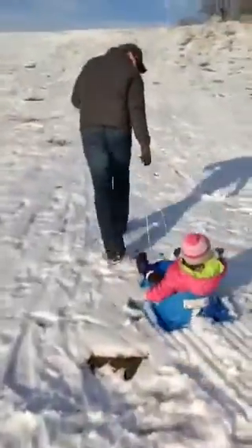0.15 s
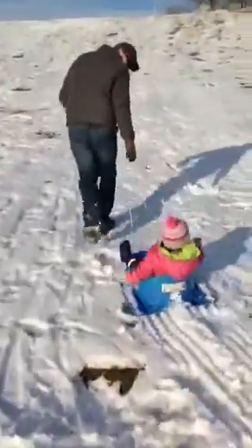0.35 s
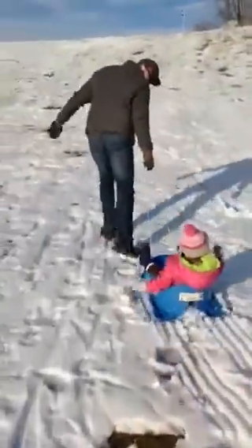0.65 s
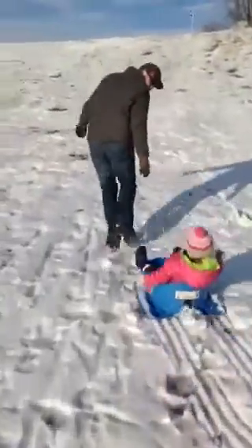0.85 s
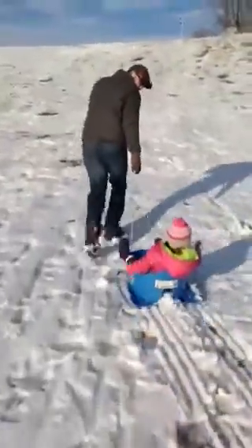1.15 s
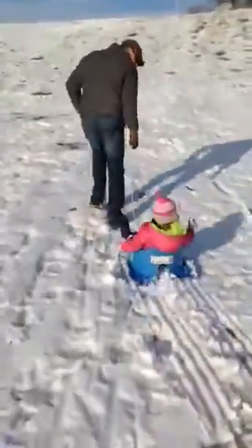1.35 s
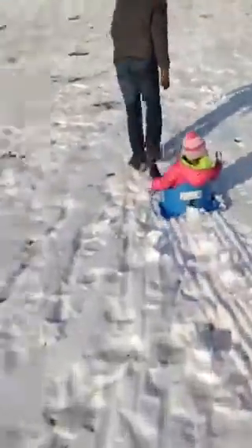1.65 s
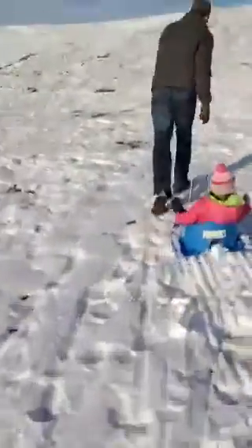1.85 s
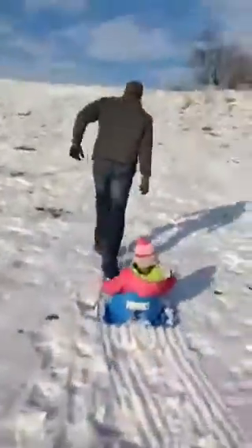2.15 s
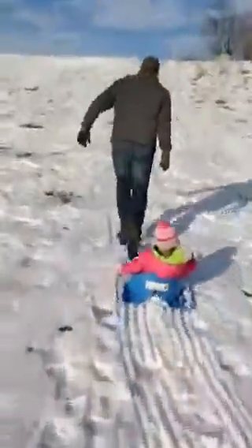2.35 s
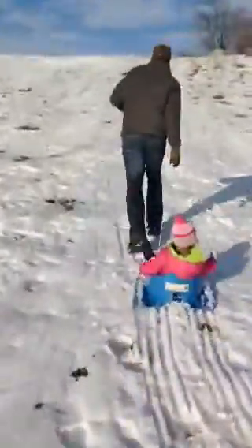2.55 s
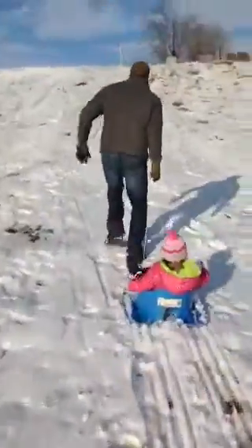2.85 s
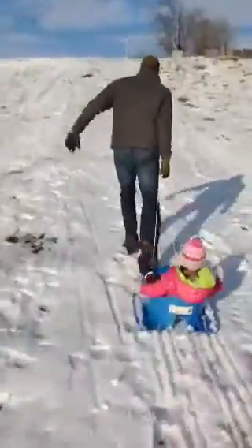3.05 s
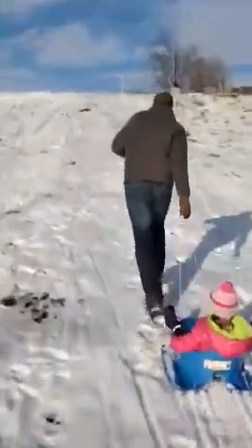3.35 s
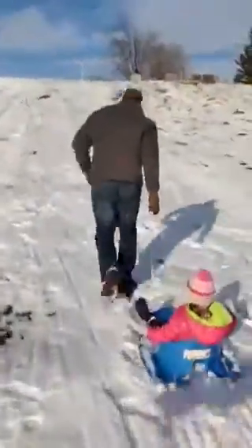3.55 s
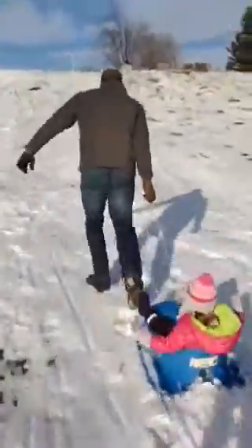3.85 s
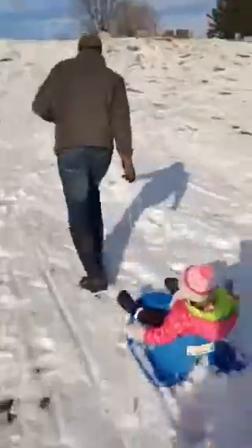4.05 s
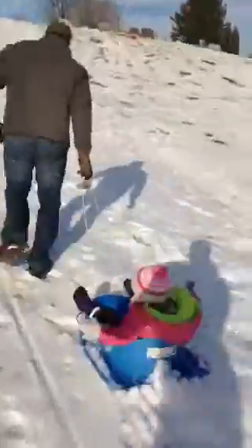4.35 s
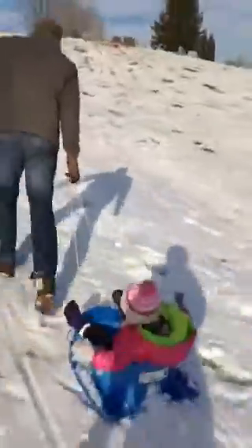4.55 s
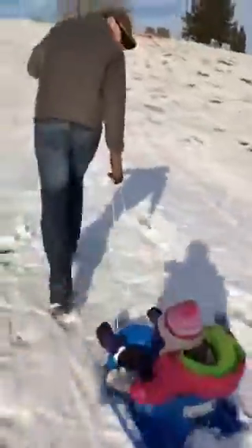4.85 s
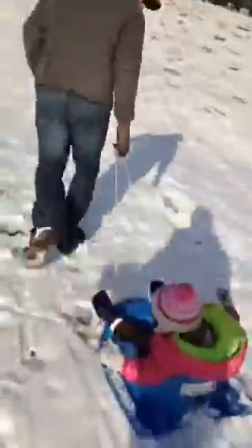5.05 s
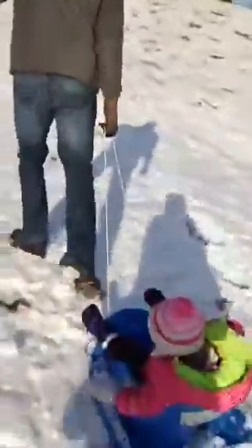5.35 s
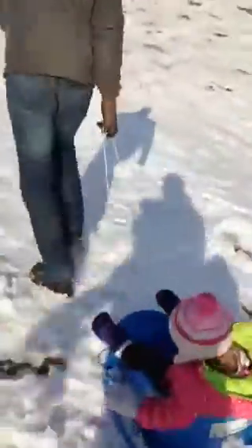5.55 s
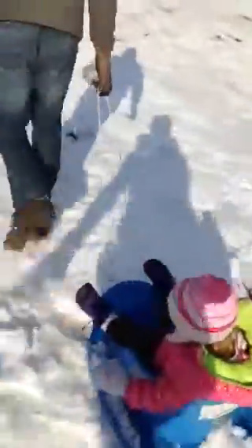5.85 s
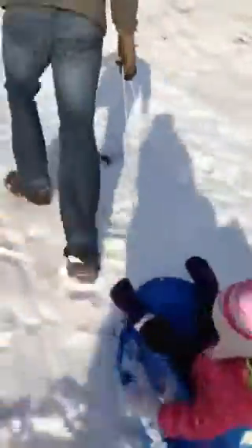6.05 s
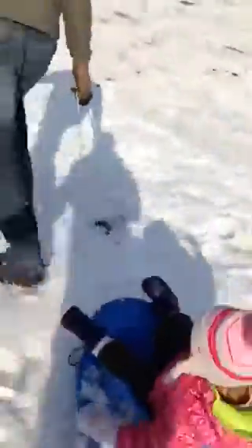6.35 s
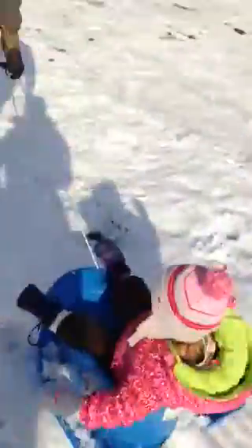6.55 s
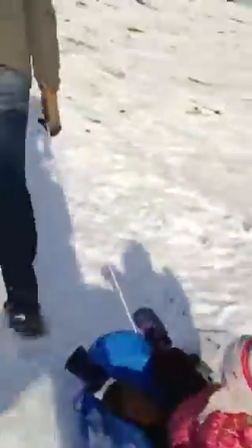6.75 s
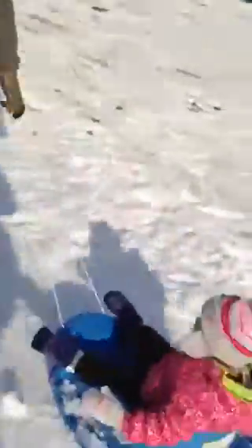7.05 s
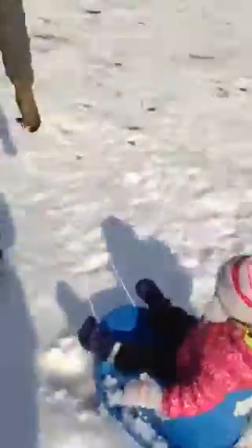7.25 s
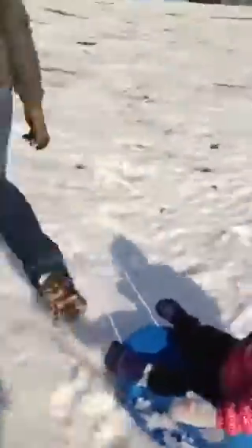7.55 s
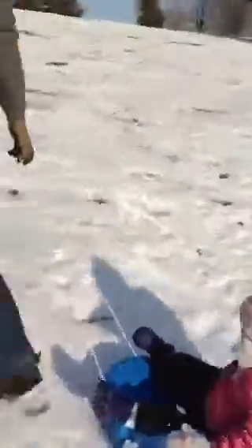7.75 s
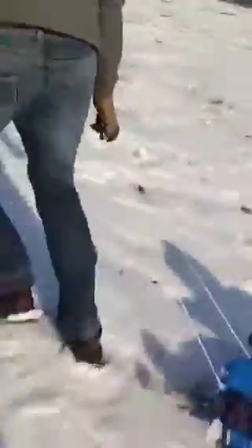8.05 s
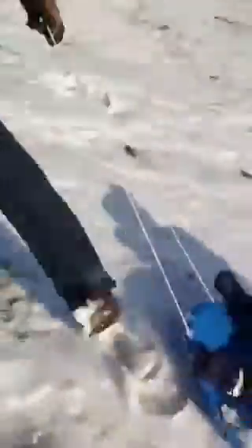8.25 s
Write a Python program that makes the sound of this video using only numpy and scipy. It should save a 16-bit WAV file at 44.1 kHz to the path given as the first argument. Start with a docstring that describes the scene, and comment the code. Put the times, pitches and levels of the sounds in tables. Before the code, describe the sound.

Crusty snow hisses and rasps steadily under a plastic sled, swelling and dipping with the pulls on its rope. Scattered crunching steps, small icy cracks and soft thuds break through over a low rumble. The microphone follows outdoors from a few metres back and moves in close, so the scraping gets louder and the bumps thicker, with ice clonking on the shell, before it drops back slightly.

```python
"""A gritty hiss and scrape, surging with each tug: a plastic sled pulled by a rope up crusty snow.
Ice grains shear under the hull and ring the plastic; the hull rumbles over bumps and knocks on lumps.
Boots and hull break the crust with crunches and brittle snaps; hard ice makes the shell clonk.
The sound grows as the microphone catches up with the sled, and eases as it drops back at the end."""
import sys
import numpy as np
from scipy import signal
from scipy.fft import rfft, irfft
from scipy.io import wavfile
from scipy.ndimage import uniform_filter1d

SR = 44100
rng = np.random.default_rng(int(sys.argv[2]) if len(sys.argv) > 2 else 0)


def digitize_waveform(pressure):
    """Quantize a signal to 16-bit integers and store it at the path in sys.argv[1].

    Rows of a 2-D input are taken as channels; values are limited to [-1, 1].
    """
    field = np.atleast_2d(pressure).T
    bounded = np.clip(field, -1, 1)
    quanta = np.round(bounded * 32767).astype(np.int16)
    wavfile.write(sys.argv[1], SR, quanta)


N = 371322
TIME_S = np.arange(N) / SR

# Source spectra. Each row: frequency in Hz, relative level in dB.
HISS_FAR_SPECTRUM = [(300, -7), (1000, -7.5), (2500, -1.5), (4000, 1), (6000, 1), (8000, 1), (10500, 0.7),
                     (13000, -1.5), (15500, -2)]
HISS_NEAR_SPECTRUM = [(300, -21), (1000, -6), (2500, -5.5), (3400, -5), (4600, -4), (6000, -2.5),
                      (8000, -4.5), (10500, -3), (13000, 2.5), (15500, -0.9)]
SCRAPE_SPECTRUM = [(100, -7), (250, -3.5), (450, -3), (800, 0.5), (1300, -4), (2000, -2), (3000, -5.5),
                   (5000, -20), (10000, -9.5)]
RUMBLE_SPECTRUM = [(15, -43), (30, -42), (48, 4), (75, 5), (120, 1.5), (200, 1), (320, -5.5), (600, -11),
                   (1500, -61)]
CRUNCH_SPECTRUM = [(60, -35), (200, 10), (450, -0.5), (800, 0.5), (1300, -1), (2200, 0), (3500, -1.5),
                   (5200, -19), (14000, -27)]

# Top of the hiss. Each row: time in seconds, share of the near spectrum from 0 to 1.
HISS_BRIGHTNESS = [(1.35, 0.45), (1.55, 0.7), (1.9, 0.47), (6.2, 0.58), (7.3, 0.63), (8.2, 0.8)]
# Treble of the hiss. Each row: time in seconds, gain in dB.
HISS_TREBLE = [(0, 1), (.5, -1.5), (1.0, -1.5), (1.36, 0.5), (1.52, 1.4), (1.9, 0), (2.35, 0.5), (2.9, 0),
               (3.5, -0.3), (4.5, 0), (5.4, -1), (6.66, -0.9), (6.8, 2), (6.96, 0.8), (7.3, 0.5),
               (7.75, -0.5), (8.15, 0.5), (8.3, -2.5)]
# Treble hollow, drifting as the microphone turns. Each row: time in seconds, centre in Hz, depth in dB.
HISS_HOLLOW = [(1.2, 8450, 1.5), (1.8, 6300, 2.5), (5.6, 9050, 0.5), (6.8, 5200, -0.5), (8.42, 3970, 2.5)]
# Narrow notch falling through the top of the hiss. Each row: time in seconds, centre in Hz, depth in dB.
HISS_NOTCH = [(1.35, 12800, 4), (1.52, 11900, 5), (1.7, 11100, 6), (1.95, 10500, 0)]
# Rasp of the runners, shifting with the snow. Each row: time in seconds, centre in Hz, lift in dB.
RUNNER_RASP = [(0, 3970, 3), (1.1, 4100, 0.5), (1.6, 3700, 1.5), (3.7, 3900, 0), (4.2, 3900, 2.5),
               (4.6, 3300, 0), (5.1, 3250, 1), (5.6, 3350, 2), (6.1, 3160, 2), (6.7, 3320, 2.5),
               (7.2, 2900, 0), (7.6, 2300, 1), (8.0, 2500, 0.5), (8.42, 2280, 4)]
# Scrape band: sings on packed snow, damped in loose. Each row: time in seconds, centre in Hz, lift in dB.
PACKED_BAND = [(0, 1450, 4.5), (.4, 1450, 1.5), (.8, 1500, 1.5), (1.3, 1450, 1.5), (1.7, 1500, 1.5),
               (2.05, 1450, 5.5), (2.65, 1350, 5), (3.0, 1430, 7), (3.2, 1290, 5.5), (3.38, 1050, 2.5),
               (3.9, 1020, 5), (4.3, 990, 0), (4.9, 900, -1.5), (5.5, 950, -4.5), (6.3, 910, -2.5),
               (7.0, 800, -0.5), (7.5, 746, -5), (8.0, 675, -5), (8.35, 800, 1.5)]
# Hull resonances and the gap above them. Each row: centre in Hz, width in Hz, gain on packed snow in dB.
HULL_RESONANCES = [(1020, 450, 1), (1380, 100, 2), (2100, 190, 3.5), (2650, 200, -4)]
# Pulls on the rope. Each row: time in seconds, dip as the rope slackens in dB, surge in dB.
ROPE_TUGS = [(.13, -2.5, 0.5), (.57, 2, 0), (.79, 0, 1), (1.075, 0, 2), (1.3, 1.5, 0), (1.42, 1.7, 1),
             (1.69, 2, 0.5), (1.93, 0.8, 2), (2.05, 3.5, 2), (2.33, 2, -0.2), (2.55, 2, 1.3),
             (2.81, 1, 0.5), (3.375, 2, 1), (3.62, -0.5, 0.7), (3.93, 0.9, -1), (4.13, -1, 1), (5.0, 0, 0),
             (5.33, 1, 0.5), (5.57, 1, 0.5), (5.96, 2, 1), (6.41, 1.5, 2.6), (6.6, 1.5, -1), (6.755, 0, 2),
             (7.09, 1.5, 0.5), (7.24, -1.5, 1), (7.61, 2.5, -0.5), (7.69, -1, 1.7), (7.9, 3, -0.5),
             (7.95, -2, 2.5)]
# Sled to microphone. Each row: time in seconds, distance in metres.
SLED_DISTANCE = [(.15, 4.7), (.5, 4.14), (2, 4), (3.7, 3.15), (5.2, 1.85), (6.2, 1.29), (7.28, 1.42),
                 (7.56, 1.25), (8.03, 1.54), (8.35, 1.8)]
# Crust giving way under boots and hull. Each row: start in seconds, relative level in dB,
# length in seconds, slab resonance in Hz, its width in octaves.
CRUST_COLLAPSES = [(0.538, -52.5, 0.052, 700, 1.7), (1.438, -55, 0.015, 600, 0.94),
                   (2.79, -47, 0.032, 650, 2.2), (3.22, -52, 0.043, 700, 1.1),
                   (3.592, -51, 0.038, 1700, 0.63), (3.876, -53.5, 0.1, 750, 0.78),
                   (3.924, -50, 0.09, 1450, 0.64), (4.627, -52.5, 0.037, 1000, 1.0),
                   (4.676, -42.5, 0.0095, 1000, 2), (4.724, -49, 0.035, 1300, 1.1),
                   (5.388, -48.5, 0.079, 428, 0.52), (5.849, -43.5, 0.026, 1100, 2.0),
                   (6.178, -36, 0.018, 825, 0.37), (6.208, -43, 0.021, 1260, 0.38),
                   (6.378, -49, 0.075, 2600, 0.86), (6.56, -43.5, 0.039, 784, 0.28),
                   (6.728, -44, 0.032, 1910, 2.1), (6.784, -44, 0.012, 2800, 0.55),
                   (6.898, -47, 0.046, 310, 0.49), (7.014, -46, 0.011, 1200, 1.0),
                   (7.244, -43.5, 0.016, 1360, 0.45), (7.941, -47.5, 0.04, 2450, 0.44),
                   (8.219, -46, 0.011, 1000, 1.0), (8.271, -51.5, 0.04, 900, 0.89)]
# Boots and hull hitting lumps. Each row: time in seconds, peak in dB, pitch in Hz.
HEAVY_KNOCKS = [(0.14, -40, 100), (0.251, -42, 100), (0.336, -42, 200), (0.535, -33.5, 180), (.6, -34, 374),
                (0.968, -29, 197), (1.1, -40, 164), (1.153, -37, 201), (1.457, -40, 318), (1.585, -40, 343),
                (1.616, -33.5, 185), (1.846, -45, 117), (2.17, -40, 139), (2.811, -46, 312),
                (2.9563, -27.5, 680), (2.961, -21, 302), (3.244, -35.5, 128), (3.557, -37, 188),
                (3.565, -32, 404), (3.569, -24.5, 197), (3.904, -35.5, 158), (3.985, -37, 109),
                (4.228, -38, 240), (4.436, -39, 84.5), (4.584, -44, 220), (4.741, -31.5, 185),
                (4.95, -39, 101), (5.049, -37.5, 246), (5.248, -41, 199), (5.474, -29.5, 258),
                (5.599, -31, 110), (5.635, -37, 80), (5.652, -38, 131), (5.766, -36, 168),
                (5.845, -30, 112), (5.872, -35, 120), (6.067, -39, 120), (6.092, -37, 124),
                (6.12, -33, 112), (6.132, -30, 79.6), (6.184, -28, 95), (6.263, -33, 113), (6.3, -36, 75),
                (6.331, -31, 97), (6.579, -23, 115), (6.645, -32, 90), (6.675, -22.5, 167),
                (6.73, -25, 119), (6.752, -28.5, 84), (6.917, -42, 298), (6.945, -37, 278),
                (6.962, -30.5, 237), (7.016, -31, 308), (7.096, -29, 147), (7.108, -27.5, 95),
                (7.161, -34, 178), (7.223, -24, 166), (7.248, -18.5, 242), (7.259, -26, 288),
                (7.866, -32, 200), (8.053, -33, 300), (8.137, -22.5, 185), (8.19, -36, 86),
                (8.226, -27.5, 192), (8.375, -33.5, 232)]
# Icy skin breaking. Each row: start in seconds, level in dB, decay in seconds, centre in Hz.
ICE_SNAPS = [(1.146, -44, 0.0044, 5000), (2.797, -35, .003, 4300), (2.803, -42, .008, 3000),
             (4.677, -33, .005, 4200), (4.74, -41, .004, 3000), (5.862, -36, .008, 4800),
             (6.554, -28.5, 0.0065, 2370), (6.887, -29, 0.0053, 2600)]
# Hard ice striking the shell. Each row: start in seconds, level in dB, pitch in Hz.
SHELL_CLONKS = [(6.185, -29, 800), (6.19, -33, 1250), (6.556, -30, 795), (6.584, -32, 784),
                (6.882, -32.5, 880), (6.892, -30, 1280), (7.27, -36, 1400)]
# Ground under the hull. Each row: time in seconds, bumpiness in dB, bass lift as the hull sinks in dB.
GROUND_PROFILE = [(0, 4.5, -1.5), (1.3, -0.5, 0), (2.0, -7.5, 5), (3.4, 0.5, -4), (4.6, -3.5, 4.5),
                  (5.25, -2, -4), (5.75, -7, 3.5), (6.35, -0.5, 2.5), (6.95, 1.5, -5), (7.3, 3.5, -9),
                  (7.7, -0.5, -5), (8.4, 3, -12)]
# Comb of a close reflection. Each row: time in seconds, notch spacing in Hz, an unused value.
REFLECTION_COMB = [(0, 480, -10), (2.7, 425, -2), (7.5, 437, 0)]


def hiss(pull_db, judder, judder_db=0.25, patchy_db=0.96, treble_hz=7000, level_at_1m_db=-29.0):
    """Fine snow shears under the hull; it swells with each pull and as the sled nears."""
    def field_db(hz, t):
        def moving_peak_db(rows, octaves):
            return follow(rows, t, column=2) * peak(hz, follow(rows, t), octaves)
        near = follow(HISS_BRIGHTNESS, t)
        base = (1 - near) * spectrum_db(HISS_FAR_SPECTRUM, hz) + near * spectrum_db(HISS_NEAR_SPECTRUM, hz)
        flicker = patchy_db * patches(hz, t, bins=30, frames=8)
        rasp = moving_peak_db(RUNNER_RASP, octaves=0.19)
        hollow = moving_peak_db(HISS_HOLLOW, octaves=0.27)
        notch = moving_peak_db(HISS_NOTCH, octaves=0.11)
        treble = follow(HISS_TREBLE, t) * (1 - 1 / (1 + (hz / treble_hz) ** 8))
        return base + flicker + rasp + treble - hollow - notch
    snow = unit(rng.standard_normal(N) + 0.39 * grains(per_s=7000, spread_db=0.5))
    gain_db = level_at_1m_db + spreading_db(TIME_S) + pull_db + judder_db * judder
    return reshape(snow, field_db) * from_db(gain_db)


def scrape(pull_db, judder, judder_db=0.1, patchy_db=3.0, band_octaves=0.56, loose_ring_share=0.33,
           level_at_1m_db=-41.5):
    """Coarse grains catch on the plastic and ring it; uneven in loose snow, steady on packed snow."""
    def field_db(hz, t):
        flat_band = 1 / (1 + (np.log2((hz + 1) / follow(PACKED_BAND, t)) / band_octaves) ** 10)
        singing = flat_band * follow(PACKED_BAND, t, column=2)
        modes = sum(db * np.exp(-((hz - mode_hz) / width_hz) ** 2)
                    for mode_hz, width_hz, db in HULL_RESONANCES)
        ring_share = loose_ring_share + (1 - loose_ring_share) * hardness(t)
        flicker = patchy_db * patches(hz, t, bins=3, frames=9)
        return spectrum_db(SCRAPE_SPECTRUM, hz) + singing + ring_share * modes + flicker
    snow = unit(rng.standard_normal(N) + 0.46 * grains(per_s=2500, spread_db=0.5))
    bite_db = 0.77 * pull_db + wander(rate_hz=11)
    effort_db = (1 - hardness(TIME_S)) * bite_db + judder_db * judder
    gain_db = level_at_1m_db + spreading_db(TIME_S, power=0.67) + effort_db
    return reshape(snow, field_db) * from_db(gain_db)


def hardness(t, fully_packed_db=5):
    """Snow under the hull: 0 loose, 1 packed."""
    return np.clip(follow(PACKED_BAND, t, column=2) / fully_packed_db, 0, 1)


def rope_pull_db(uneven_db=0.47, slack_lead_s=0.065, slack_s=0.075, surge_s=0.04):
    """The sled's pace as a level: a lull as the rope slackens, then a surge that eases off."""
    pace_db = uneven_db * wander(rate_hz=11.5)
    t = np.arange(-SR // 4, SR // 2) / SR
    slack = np.exp(-((t + slack_lead_s) / slack_s) ** 2)
    surge = swell(np.maximum(t, 0) / surge_s)
    for time_s, slack_db, surge_db in ROPE_TUGS:
        add(pace_db, time_s + t[0], surge_db * surge - slack_db * slack)
    return pace_db


def crunches(clump_db=1.2, slab_lift_db=8.5, gain_db=6.5):
    """The crust collapses in a quick swell of clumped fractures; bigger slabs sound lower."""
    fractures = grains(per_s=11000, spread_db=3.0) * from_db(clump_db * wander(rate_hz=59))
    out, t = np.zeros(N), np.arange(SR // 2) / SR
    hz = np.fft.rfftfreq(t.size, 1 / SR)
    for start_s, db, length_s, slab_hz, octaves in CRUST_COLLAPSES:
        shape_db = spectrum_db(CRUNCH_SPECTRUM, hz) + slab_lift_db * peak(hz, slab_hz, octaves)
        snow = filtered(random_slice(fractures, t.size), from_db(shape_db))
        add(out, start_s, from_db(db + gain_db) * burst(snow, swell(t / (0.6 * length_s))))
    return out


def knocks(rise_cycles=0.39, decay_cycles=0.68, sag=0.19, lead_s=0.01181, crumble_db=-19, crumble_s=0.0092):
    """A soft blow rings for a cycle or two, its pitch sagging as the snow yields; the lump crumbles."""
    out, t = np.zeros(N), np.arange(-lead_s, 0.08, 1 / SR)
    hz = np.fft.rfftfreq(t.size, 1 / SR)
    for time_s, db, pitch_hz in HEAVY_KNOCKS + light_knocks():
        rise_s, decay_s = rise_cycles / pitch_hz, decay_cycles / pitch_hz
        envelope = np.exp(-(np.minimum(t, 0) / rise_s) ** 2 - (np.maximum(t, 0) / decay_s) ** 0.87)
        cycles = np.cumsum(pitch_hz * (1 - sag * np.tanh(t / decay_s))) / SR
        blow = envelope * np.sin(2 * np.pi * (cycles + rng.random()))
        noise = rng.standard_normal(SR // 8)[:t.size]
        crumbs = unit(filtered(noise, peak(hz, 1.18 * pitch_hz, octaves=1.0)))
        crumbs *= swell((t + lead_s) / crumble_s)
        add(out, time_s + t[0], from_db(db) * (blow + from_db(crumble_db) * crumbs))
    return out


def light_knocks(per_s=2.5, level_at_1m_db=-37, spread_db=10, centre_hz=176, spread_octaves=0.73):
    """Small lumps met at random; rows as in HEAVY_KNOCKS."""
    when, size, pitch = rng.random((100, 3))[:round(per_s * N / SR)].T
    time_s = when * N / SR
    peak_db = level_at_1m_db + spread_db * (2 * size - 1) + spreading_db(time_s)
    pitch_hz = centre_hz * 2 ** (spread_octaves * (2 * pitch - 1))
    return list(zip(time_s, peak_db, pitch_hz))


def snaps(onset_s=0.0005):
    """The crust's icy skin breaks in a spray of tiny cracks, gone within milliseconds."""
    cracks = grains(per_s=9000, spread_db=1)
    out, t = np.zeros(N), np.arange(SR // 10) / SR
    hz = np.fft.rfftfreq(t.size, 1 / SR)
    for start_s, db, decay_s, centre_hz in ICE_SNAPS:
        ice = filtered(random_slice(cracks, t.size), peak(hz, centre_hz, octaves=1.0))
        envelope = np.minimum(t / onset_s, 1) * np.exp(-t / decay_s)
        add(out, start_s, from_db(db) * burst(ice, envelope))
    return out


def clonks(onset_s=0.0015, decay_s=0.0082):
    """A panel of the shell, struck by ice, rings hollowly until the snow damps it."""
    out, t = np.zeros(N), np.arange(SR // 10) / SR
    envelope = np.minimum(t / onset_s, 1) * np.exp(-t / decay_s)
    for start_s, db, pitch_hz in SHELL_CLONKS:
        add(out, start_s, from_db(db) * envelope * np.sin(2 * np.pi * pitch_hz * t))
    return out


def rumble(lumpy_db=3.0, bass_hz=130, level_at_1m_db=-45.5):
    """The loaded hull rides over small bumps, damped by the snow."""
    jolts = unit(rng.standard_normal(N) + 0.41 * grains(per_s=160, spread_db=2.0))
    hull_db = spectrum_db(RUMBLE_SPECTRUM, np.fft.rfftfreq(N, 1 / SR))
    bumps = filtered(jolts, unit(from_db(hull_db)))
    bass = signal.sosfiltfilt(signal.butter(2, bass_hz, fs=SR, output="sos"), bumps)
    bass_gain = from_db(follow(GROUND_PROFILE, TIME_S, column=2))
    ride = (bumps + bass * (bass_gain - 1)) * from_db(lumpy_db * wander(rate_hz=20))
    gain_db = level_at_1m_db + spreading_db(TIME_S, power=0.88) + follow(GROUND_PROFILE, TIME_S)
    return unit(ride) * from_db(gain_db)


def reflected(x, ripple_db=0.94, fade_hz=2300):
    """A reflection about 2 ms late cuts evenly spaced notches; rough snow scatters the treble instead."""
    def field_db(hz, t):
        comb = np.cos(2 * np.pi * hz / follow(REFLECTION_COMB, t))
        return -ripple_db * comb * np.exp(-(hz / fade_hz) ** 2)
    return np.std(x) * reshape(x, field_db)


def spreading_db(t, power=1.0):
    """Gain against 1 m; power 1 loses 6 dB per doubling of distance."""
    return -20 * power * np.log10(follow(SLED_DISTANCE, t))


def grains(per_s, spread_db):
    """Ice grains snapping at random: many small, a few large."""
    size = from_db(spread_db * np.minimum(rng.exponential(1, N), 4))
    return unit(size * rng.uniform(-1.11, 1, N) * (rng.random(N) < per_s / SR))


def wander(rate_hz, slowest_hz=2):
    """Smooth noise of rms 1, from slowest_hz to about rate_hz."""
    hz = np.fft.rfftfreq(N, 1 / SR)
    return unit(filtered(rng.standard_normal(N), np.exp(-(hz / rate_hz) ** 2) * (hz > slowest_hz)))


def patches(hz, t, bins, frames):
    """Random field of rms 1, smoothed over frequency and time."""
    field = uniform_filter1d(rng.standard_normal((hz.size, t.size)), bins, axis=0)
    return unit(uniform_filter1d(field, frames, axis=1))


def reshape(x, field_db):
    """Time-varying filter field_db(hz, t); output rms 1."""
    hz, t, frames = signal.stft(x, SR, nperseg=512, noverlap=384)
    frames = frames * from_db(field_db(hz[:, None], t[None]))
    return unit(signal.istft(frames, SR, nperseg=512, noverlap=384)[1][:N])


def filtered(x, bin_gains):
    return irfft(rfft(x) * bin_gains, x.size)


def random_slice(x, samples):
    return np.roll(x, rng.integers(N))[:samples]


def spectrum_db(rows, hz):
    """Levels joined on a log-frequency axis."""
    row_hz, db = np.transpose(rows)
    return np.interp(np.log(hz + 1), np.log(row_hz), db)


def peak(hz, centre_hz, octaves):
    """Bell of height 1 on a log-frequency axis."""
    return np.exp(-(np.log2((hz + 1) / centre_hz) / octaves) ** 2)


def swell(age):
    """Rises to 1 at age 1, then dies away."""
    return (age * np.exp(1 - age)) ** 2


def burst(x, envelope):
    """Shapes x, with rms 1 where the envelope is 1."""
    return unit(x * envelope) * np.sqrt(np.mean(envelope ** 2))


def follow(rows, t, column=1):
    """One table column, interpolated at the times t."""
    rows = np.asarray(rows)
    return np.interp(t, rows[:, 0], rows[:, column])


def add(mix, start_s, sound):
    part = mix[max(round(start_s * SR), 0):][:len(sound)]
    part += sound[:len(part)]


def from_db(db):
    return 10 ** (np.asarray(db) / 20)


def unit(x):
    """Scales to rms 1."""
    return x / np.sqrt(np.mean(x ** 2) + 1e-20)


def scene():
    """Hiss and scrape share the sled's pace and fine judder; all sources are centred."""
    pull_db, judder = rope_pull_db(), wander(rate_hz=86, slowest_hz=12)
    snow = hiss(pull_db, judder) + scrape(pull_db, judder) + crunches()
    sound = reflected(snow) + snaps() + clonks() + rumble() + knocks()
    return np.array([sound, sound])


def record(dry, low_cut_hz=29, high_cut_hz=15430):
    """The small microphone loses the deepest bass; a steep low-pass limits the band."""
    thin = signal.sosfilt(signal.butter(3, low_cut_hz, "highpass", fs=SR, output="sos"), dry)
    low_pass = signal.firwin(701, high_cut_hz, window=("kaiser", 8), fs=SR)
    return signal.oaconvolve(thin, low_pass[None], "same")


dry = scene()
out = record(dry)
digitize_waveform(out)
```